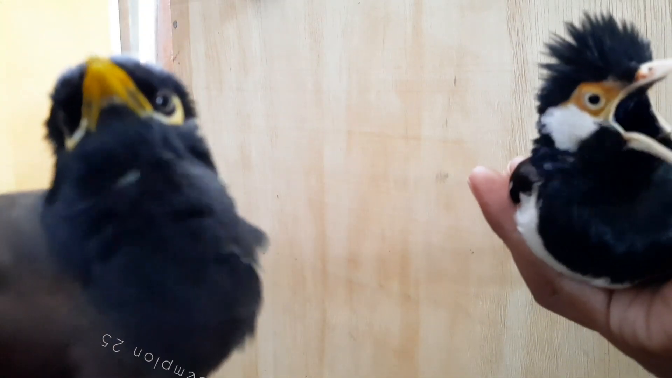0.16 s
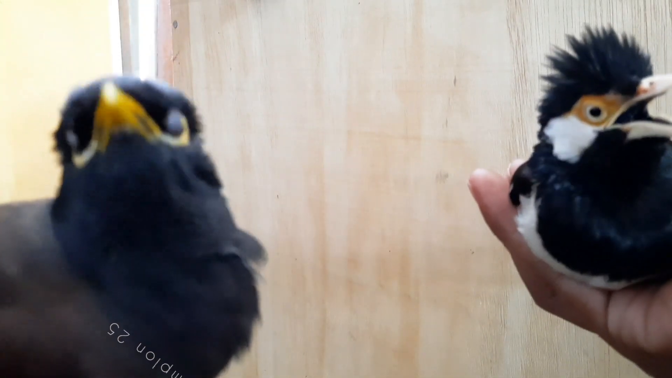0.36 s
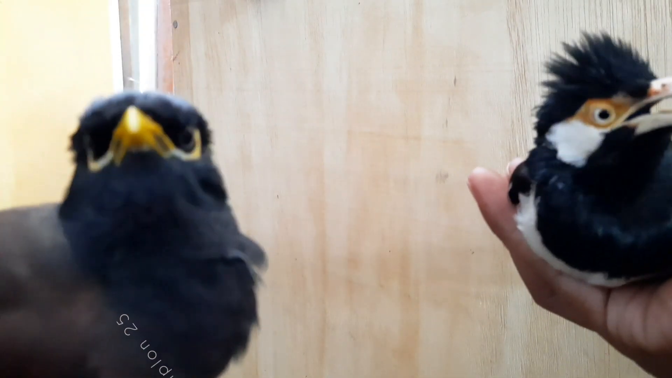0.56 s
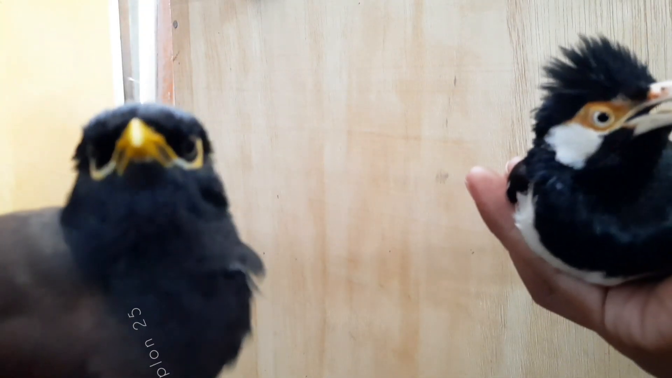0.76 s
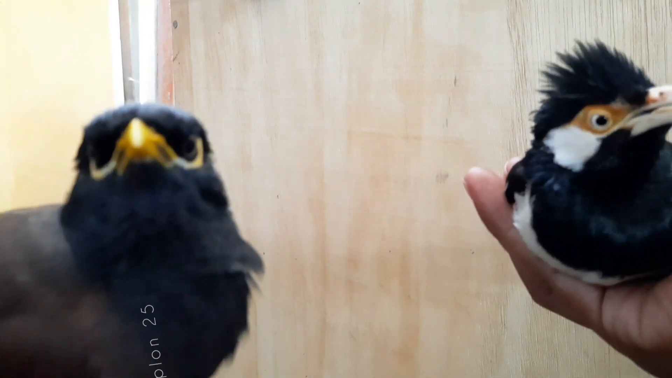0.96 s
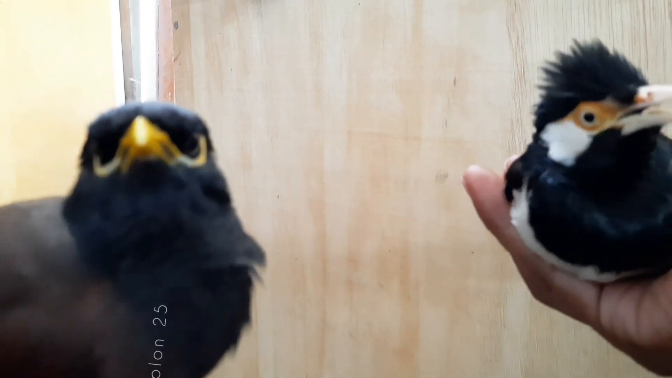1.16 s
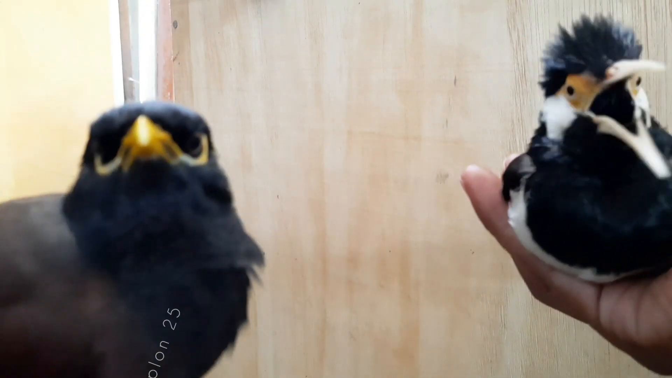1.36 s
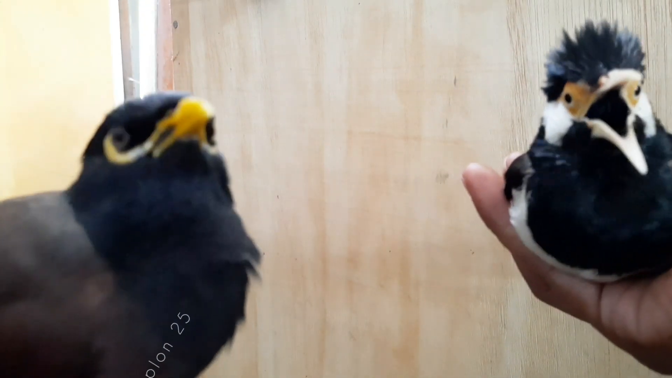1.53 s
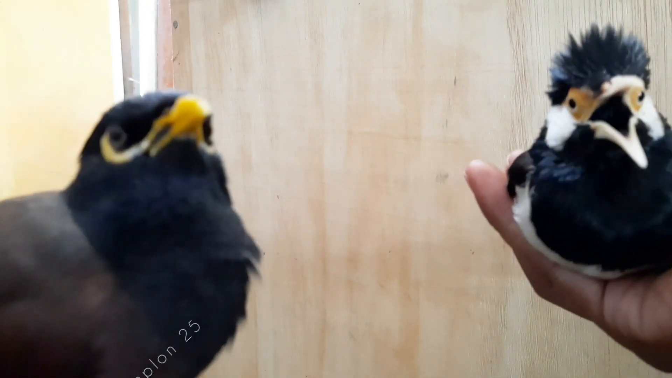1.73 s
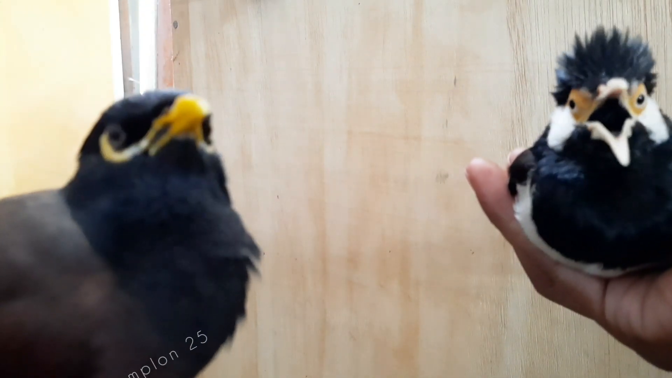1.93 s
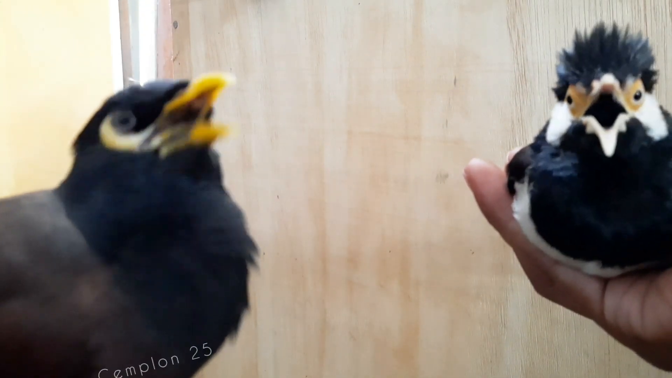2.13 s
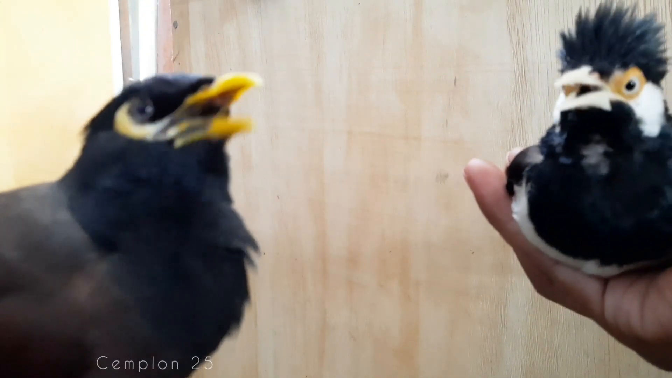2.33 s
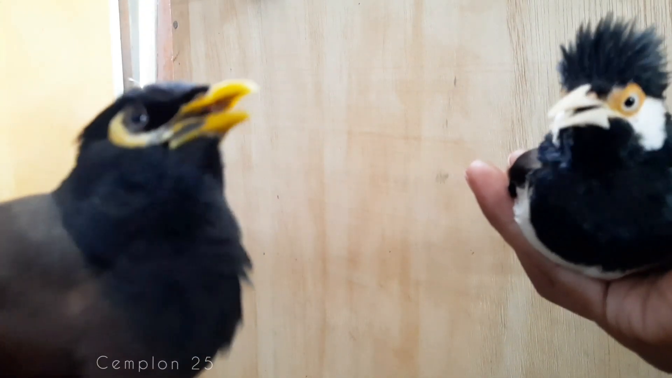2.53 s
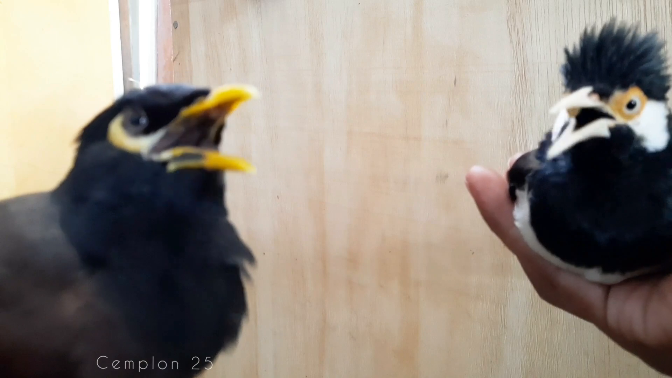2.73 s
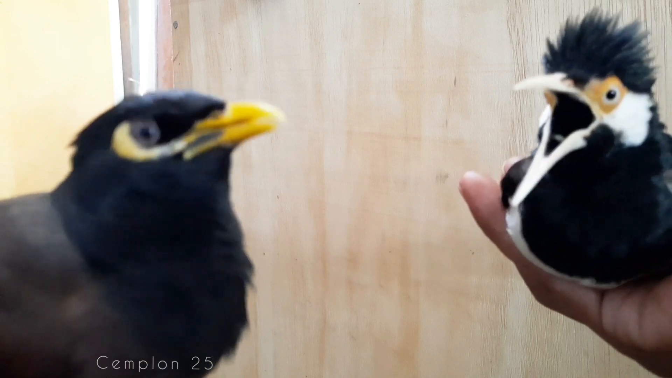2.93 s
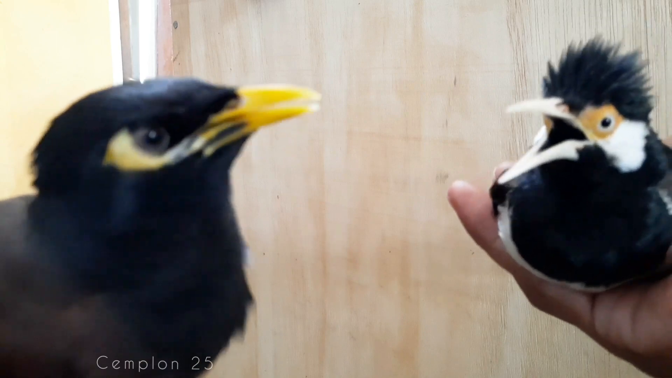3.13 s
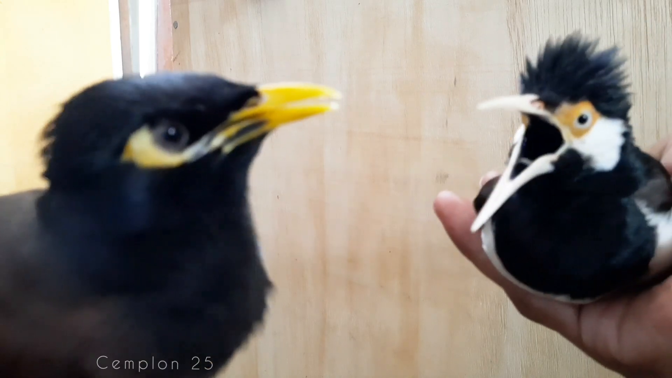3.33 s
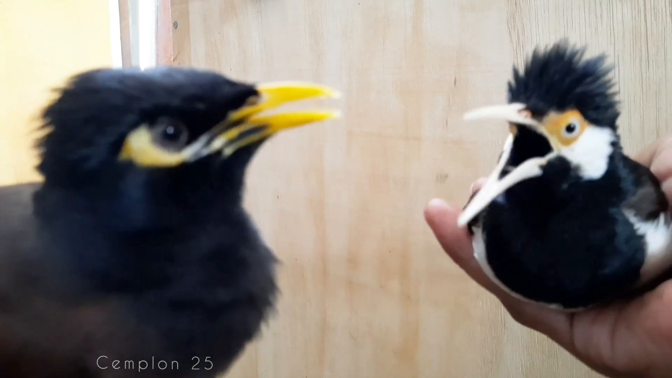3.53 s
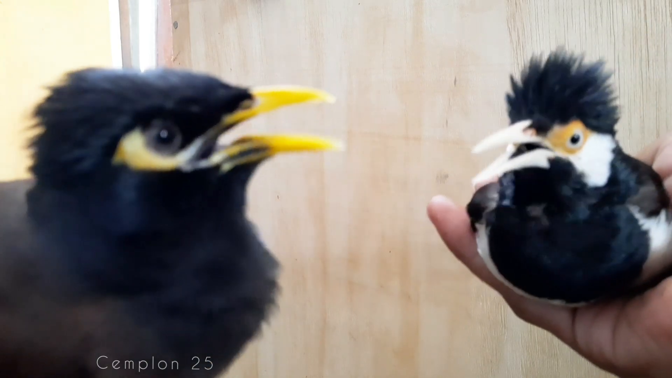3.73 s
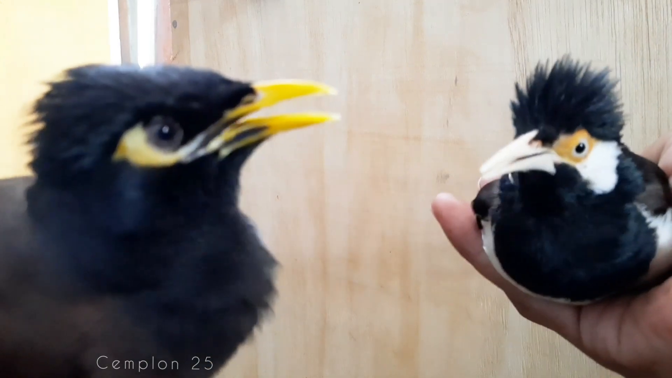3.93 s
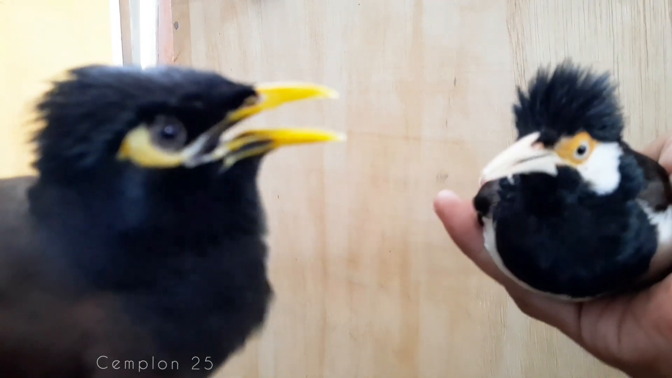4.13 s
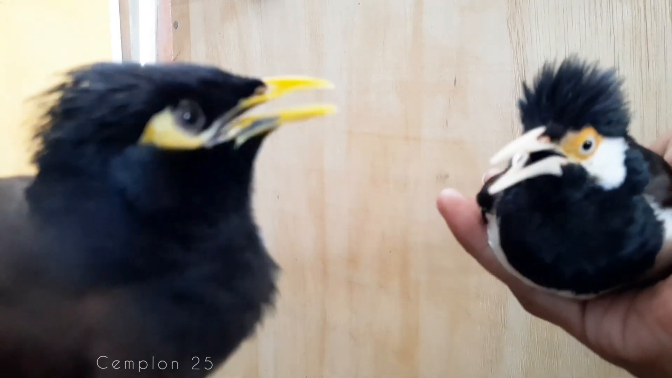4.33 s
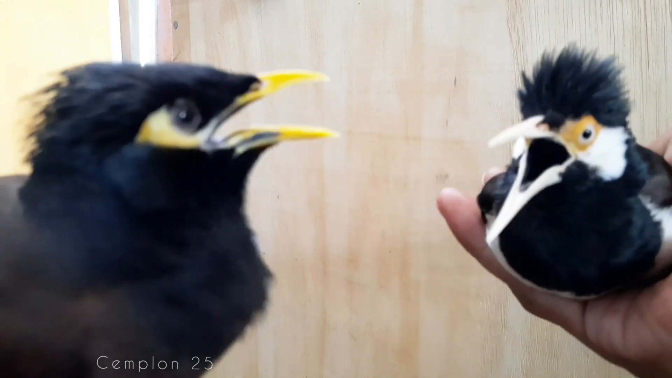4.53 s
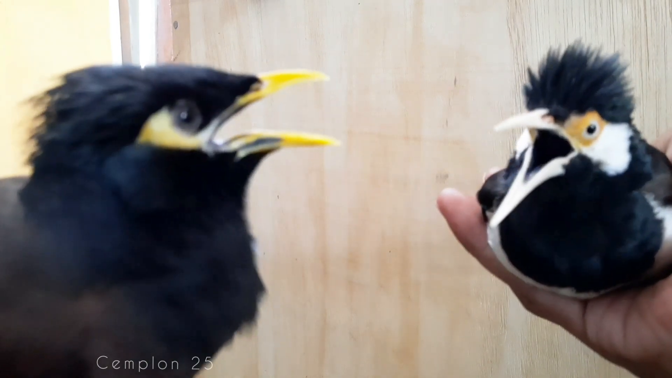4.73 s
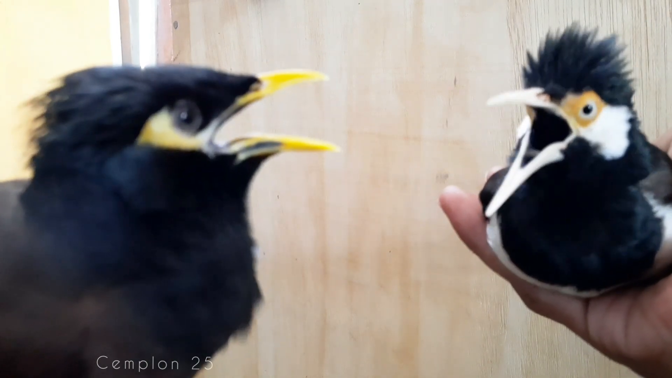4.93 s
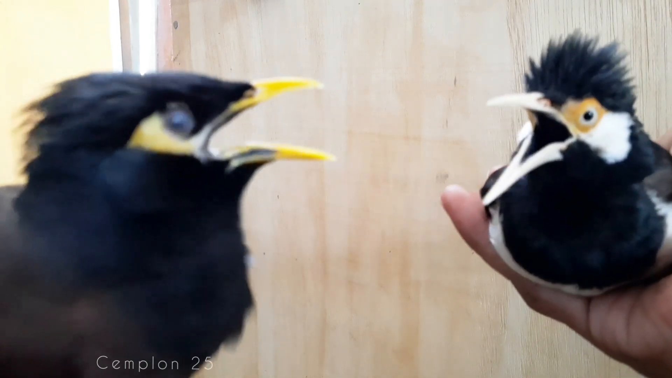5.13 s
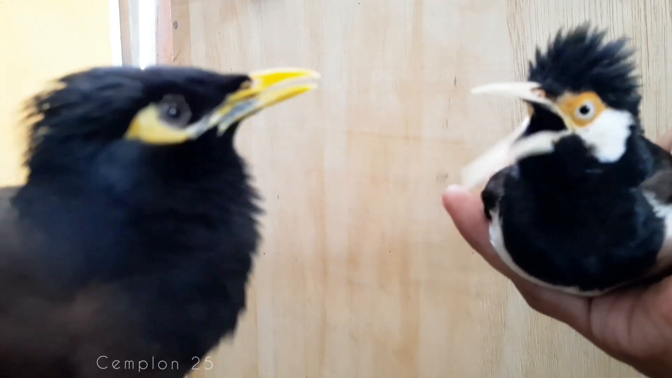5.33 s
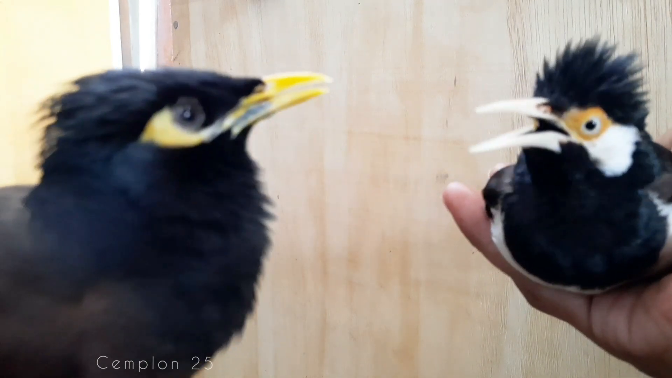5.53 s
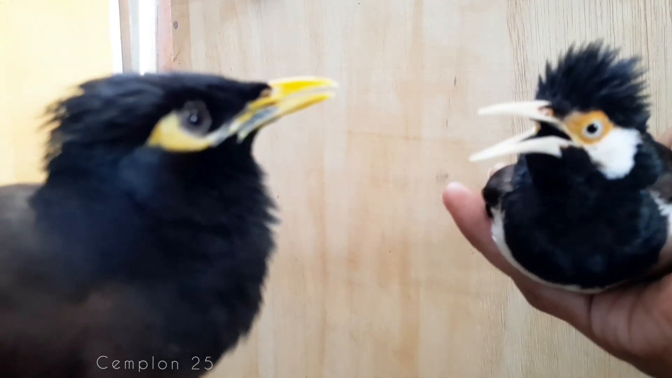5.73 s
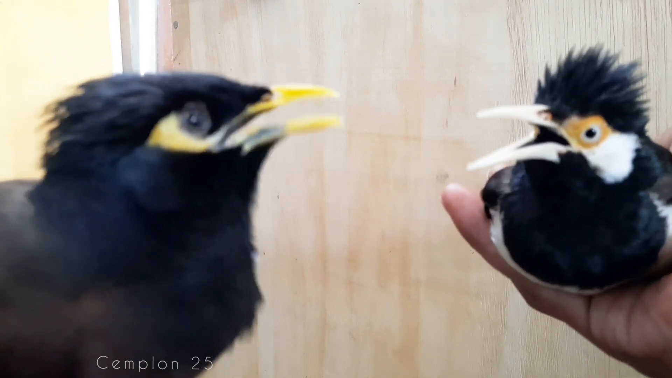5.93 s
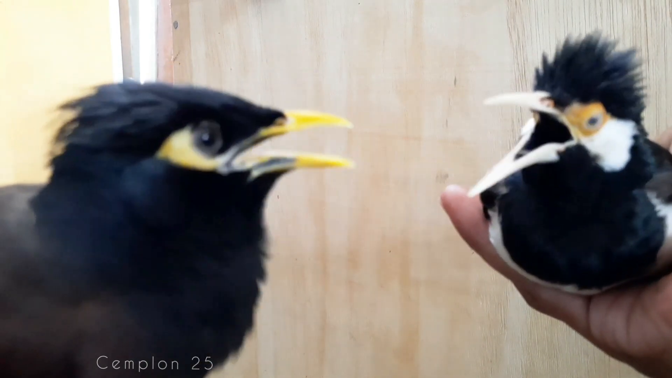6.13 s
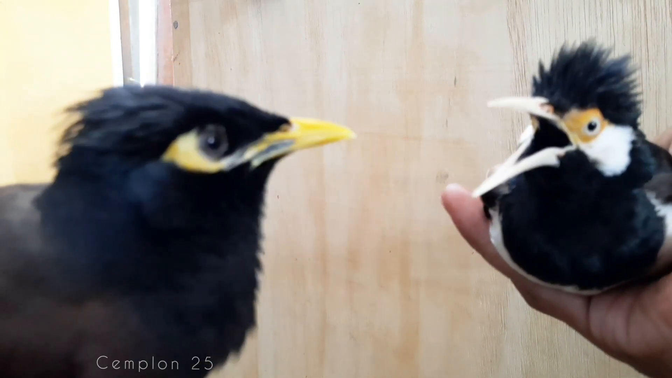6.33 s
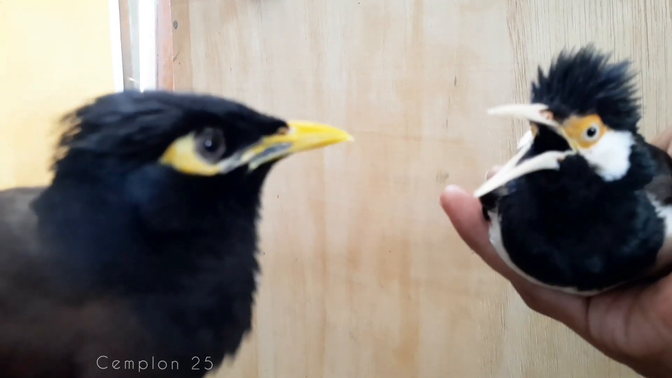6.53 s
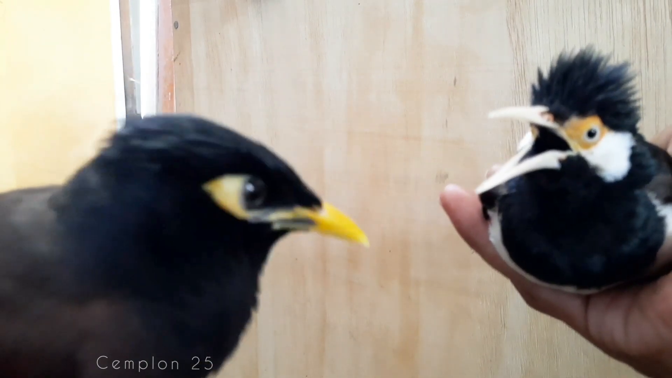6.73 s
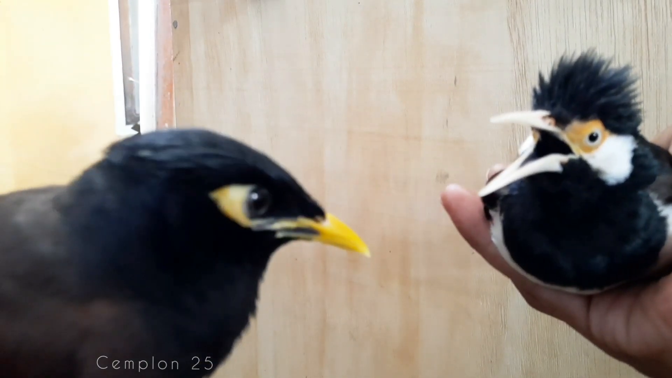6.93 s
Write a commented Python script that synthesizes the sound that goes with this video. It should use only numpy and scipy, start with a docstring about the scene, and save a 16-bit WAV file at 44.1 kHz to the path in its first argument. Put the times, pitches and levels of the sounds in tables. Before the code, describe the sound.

Close myna and pied starling calls indoors: loud piercing whoops, a long wail, then dense squawks and chirps, with a dull engine hum outside.

```python
"""A small room, close to a wall: a pied starling and a myna call at each other near a pair of microphones.
Each voices gliding whistles and cries, often two at once: unsteady tones with overtones from the syrinx.
They break into squawks of tumbling pitch; between them pulses ring the throat as dry rasps, ticks and
a low growl. Outside an engine drones faintly, its firings filtered by the walls, over soft room hiss."""
import sys
import numpy as np
from scipy import signal
from scipy.fft import rfft, irfft
from scipy.io import wavfile
from scipy.ndimage import uniform_filter1d

SR = 44100
rng = np.random.default_rng(int(sys.argv[2]) if len(sys.argv) > 2 else 0)


def store_wav(level_fs):
    """Save 16-bit WAV to argv[1]."""
    pcm = np.round(np.clip(np.atleast_2d(level_fs), -1, 1) * 32767)
    wavfile.write(sys.argv[1], SR, pcm.T.astype(np.int16))


N = 307818
TIME = np.arange(N) / SR
STEP_S = .001   # spacing of the pitch and level controls
LEFT_LEAD_S = .00023   # harsh sounds reach the left microphone this much earlier
CUTOFF_HZ = 15900

# engine outside, pace: (time [s], firing rate [1/s])
ENGINE_SPEED = [(0, 27.5), (.5, 27.5), (1.4, 27.5), (2.4, 27.5), (2.85, 26.5), (3.3, 25), (4.3, 23.5),
                (5.5, 24.5), (7, 26)]
# engine outside, loudness: (time [s], level [dB])
ENGINE_LEVEL = [(0.0, -45), (0.66, -40), (2.88, -36.5), (3.89, -46.5), (4.31, -42), (5.15, -46),
                (5.75, -44), (6.01, -51.5), (6.69, -44), (6.98, -45.5)]
# engine colour early on: (frequency [Hz], gain [dB])
ENGINE_NEAR = [(21, -43), (35, -9), (62, 7), (81, -31.5), (92, -5), (152, 5.5), (172, -6), (195, -11),
               (267, -14.5), (298, -6), (326, 0), (487, -24), (700, -29.5), (910, -57.5), (1540, -120)]
# engine colour later, and of its diffuse part: (frequency [Hz], gain [dB])
ENGINE_FAR = [(21, -51.5), (35, -17), (64, -0.5), (151, 3.5), (189, -17), (216, -1), (255, -13), (312, 1),
              (430, -28.5), (484, -42), (600, -17), (780, -47.5), (1320, -120)]
# exhaust booms at 6 and 12 times the firing rate: (time [s], sixth order peak [dB], twelfth order peak [dB])
BOOM = [(0, -54, -72), (.6, -59, -46), (1.15, -56, -39.5), (1.4, -43, -57), (2.3, -39.5, -50),
        (2.9, -34.5, -57), (3.4, -49, -48.5), (4, -64.5, -61.5)]
# colour of the room air: (frequency [Hz], gain [dB])
AIR = [(240, -25), (400, -7.5), (598, -22.5), (645, -18), (1090, -28.5), (1380, -26), (1760, -29.5),
       (1960, -26), (4650, -48), (5270, -22), (5520, -48), (13900, -49), (16000, -71)]
# loudness of the room air: (time [s], level [dB])
AIR_LEVEL = [(0, -53), (1, -50.5), (2.7, -48.5), (4, -51), (5.2, -55.5), (6.3, -59), (7, -59.5)]
# reflections off the near wall at the left microphone: (delay [s], level [dB])
WALL_ECHOES = [(.0031, -24.5), (.0068, -18), (.0115, -21)]
# colour of the reverberation: (frequency [Hz], gain [dB])
ROOM_COLOUR = [(200, -5.5), (1000, 2), (2500, -1.5), (3800, 1), (6000, -3), (11000, -2), (16000, -12.5)]
# left-right balance at the microphones: (frequency [Hz], left over right [dB])
BALANCE_DB = [(300, 4.5), (750, 6.5), (1500, 3), (2200, 13), (3100, -1), (4400, 2.5), (6000, 4.5),
              (7000, -0.5), (11200, 8.5), (14000, 0.5)]
# relative weight of the voice's high overtones: (frequency [Hz], gain [dB])
OVERTONES = [(2500, 26.5), (4000, 2.5), (6500, 2), (8400, -9), (9700, -9), (11400, 2), (13000, -6.5),
             (15500, -13)]

# whoops swoop down and climb again: (start [s], lowest [s], end [s], top [Hz], lowest pitch [Hz],
# end pitch [Hz], level [dB], left over right [dB])
WHOOPS = [(-.02, 0.077, .208, 5670, 2720, 4160, -9.5, -6),
          (1.272, 1.377, 1.4963, 5680, 3000, 4120, -11, -4.5)]
# opening upward flick: length and share of the pitch; curve of the swoop
WHOOP_FLICK_S, WHOOP_FLICK, WHOOP_BEND = .013, .13, 2.5
# whoops are loudest at the bill's resonance: (pitch [Hz], gain [dB])
WHOOP_GAIN = [(2700, -9.5), (3000, 0), (3280, -0.5), (3650, -3), (4050, -4.5), (5600, -2.5)]
# the octave takes over on the lowest whoop notes: (pitch [Hz], octave [dB])
WHOOP_OCTAVE = [(2700, -3.5), (2950, -16), (3250, -31), (4100, -23.5), (5600, -24.5)]

# flutes, pure held notes: (start [s], end [s], first pitch [Hz], last pitch [Hz], scoop [share], droop [share],
# level [dB], swell [dB], octave [dB], higher overtones [dB], left over right [dB])
FLUTES = [(0, .13, 1539, 1710, 0.31, 0.046, -21, -4.5, -13.5, -17, 8.5),
          (2.19, 2.47, 1311, 1297, 0.13, 0.039, -26, -3.5, -9.5, -25, 10.5),
          (4.098, 4.169, 1188, 1179, 0.078, 0.0056, -29.5, 2, 11, -5, 2)]
# cries, hoarse held notes: (start [s], end [s], first pitch [Hz], last pitch [Hz], scoop [share],
# droop [share], level [dB], swell [dB], octave [dB], higher overtones [dB], left over right [dB])
CRIES = [(4.395, 4.485, 4330, 4550, 0.084, 0.012, -19, -19, -24, -19, -0.5),
         (4.802, 4.938, 2306, 2180, 0.049, 0.21, -22, -6, 7, -3.5, 24),
         (5.184, 5.312, 2045, 2419, 0.062, 0.042, -17.5, 0, -0.5, -9.5, 8.5),
         (6.062, 6.162, 2170, 2295, .27, .12, -21, 2, -13.5, -16.5, 12),
         (6.095, 6.207, 2077, 2012, .05, .11, -24.5, 1.5, 6, -4, -19)]
SCOOP_S, DROOP_S = 0.011, 0.022   # time constants of the held notes' opening scoop and closing droop

# squawks: (start [s], end [s], first pitch [Hz], last pitch [Hz], level [dB])
SQUAWKS = [(0.01, 0.051, 2100, 1886, -34), (2.595, 2.71, 1500, 1332, -37), (2.737, 2.894, 1500, 1310, -34),
           (2.948, 2.965, 1723, 1500, -28), (3.729, 3.81, 1300, 1063, -29), (4.389, 4.462, 1500, 1075, -21),
           (4.622, 4.689, 1500, 850, -18.5), (4.814, 4.915, 1719, 977, -20.5),
           (5.056, 5.103, 1730, 1155, -20.5), (6.097, 6.118, 1104, 944, -29)]
# shaky slides: (start [s], peak [s], end [s], first pitch [Hz], peak pitch [Hz], last pitch [Hz],
# level at the peak [dB], octave [dB], higher overtones [dB], left over right [dB])
SLIDES = [(.128, .142, 0.17, 1500, 835, 430, -34.5, 0.5, -2.5, 8),
          (.205, .235, 0.32, 2900, 2200, 1850, -27, -30, -19.5, -1.5),
          (3.712, 3.735, 3.74, 1222, 990, 860, -36.5, -2, 0, 4),
          (4.44, 4.448, 4.495, 3500, 3630, 3100, -18.5, -19, -22.5, -0.5),
          (4.652, 4.661, 4.79, 3850, 3550, 3000, -25.5, -15.5, -16.5, 1.5),
          (6.155, 6.168, 6.2, 1980, 1600, 1033, -27, -14, -18, 6)]
# chirps: (start [s], peak [s], end [s], first pitch [Hz], peak pitch [Hz], last pitch [Hz],
# level at the peak [dB], octave [dB], higher overtones [dB], left over right [dB])
CHIRPS = [(3.798, 3.812, 3.834, 4730, 3900, 3894, -25.5, -10, -24, 8),
          (5.089, 5.096, 5.118, 3670, 3810, 3400, -10, -28, -26, 1),
          (5.312, 5.34, 5.385, 4535, 3076, 2250, -6.5, -21, -21, -1)]
# one faint twitter: (start [s], peak [s], end [s], first pitch [Hz], peak pitch [Hz], last pitch [Hz],
# level at the peak [dB], octave [dB], higher overtones [dB], left over right [dB])
TWITTER = [(5.39, 5.46, 5.635, 3500, 3705, 3780, -30, -18, -24.5, 2.7)]

# rasps: (start [s], end [s], level [dB])
RASPS = [(1.375, 1.408, -39), (1.533, 1.592, -42.5), (1.717, 1.746, -41), (1.907, 1.95, -40),
         (2.098, 2.123, -40), (2.291, 2.322, -35.5), (2.488, 2.53, -44.5), (3.481, 3.554, -26),
         (3.925, 3.996, -26)]
# runs of four throat ticks: (start [s], relative strength [dB])
TICKS = [(3.088, -3), (3.287, -2.5)]
TICK_GAP_S = .0244
# resonances of the open throat under rasps and ticks: (frequency [Hz], width [Hz], gain [dB])
THROAT = [(750, 310, -3.5), (1500, 250, 2), (2150, 350, -1), (2860, 140, -2), (3620, 130, -5),
          (6300, 700, -4.5), (11700, 810, -15), (14000, 990, -19)]

# arches leap up, hold and sink: (start [s], crest [s], end [s], top [Hz], half-fall time [s],
# level [dB], swell [dB], left over right [dB])
ARCHES = [(2.001, 2.044, 2.2, 6300, 0.048, -24.5, -1.5, 1), (2.327, 2.37, 2.57, 6080, 0.061, -24, -8, 4.5),
          (2.67, 2.716, 2.882, 6135, 0.071, -20, -4, 5), (4.42, 4.489, 4.531, 6740, 0.038, -19, 23, 7)]
# opening scoop (share of the pitch, time constant) and the pitch they relax towards
ARCH_SCOOP, ARCH_SCOOP_S, ARCH_REST_HZ = .58, 0.008, 2200
# an arch thins out halfway down: (pitch [Hz], gain [dB])
ARCH_GAIN = [(2500, -2), (3000, 0), (3800, 2), (4800, -3.5), (5500, 0.5), (6200, -1)]
OCTAVE_FADE_DB = 19   # arches and pips lose this much octave overtone for each octave below their top

# a yelp that breaks upward: (time [s], pitch [Hz], level [dB], octave [dB], higher overtones [dB])
YELP = [(2.775, 2016, -22, -5.5, -11), (2.786, 2826, -19.5, 0.5, -34), (2.808, 2860, -12, -23.5, -37),
        (2.82, 3500, -14.5, -27.5, -17), (2.85, 3920, -27, 2.5, 16.5), (2.868, 3860, -25, -26.5, -25)]
# the long wail: (time [s], pitch [Hz], level [dB])
WAIL = [(3.25, 1454, -25), (3.268, 1977, -24), (3.31, 2212, -27), (3.366, 2373, -26.5),
        (3.428, 2413, -24.5), (3.596, 2216, -23.5), (3.748, 1910, -18.5), (3.796, 1750, -18.5),
        (3.812, 1579, -29)]
# a falling croak: (time [s], pitch [Hz], level [dB], octave [dB], higher overtones [dB])
CROAK = [(4.169, 1121, -37.5, 24, -2), (4.196, 794, -29, 0, 7), (4.222, 750, -29, 7.5, -7.5),
         (4.245, 442.1, -43, -6.5, -10)]
# pips jump to one high pitch and drop back: (start [s], drop [s], end [s], top [Hz], level [dB],
# left over right [dB])
PIPS = [(4.341, 4.413, 4.412, 5317, -25, 0), (4.556, 4.62, 4.637, 5398, -22, -1),
        (4.776, 4.831, 4.845, 5410, -20, 2), (5, 5.055, 5.074, 5430, -21, 2)]
PIP_REST_HZ, PIP_RISE_S, PIP_SWITCH_S = 3500, .009, .002

GROWL_START_S, GROWL_END_S, GROWL_DB, GROWL_SWELL_DB = 5.21, 5.82, -34, -4.5
# low throat resonances of the growl: (frequency [Hz], width [Hz], gain [dB])
GROWL_THROAT = [(566, 600, -2), (850, 330, 4), (1132, 140, 1.5), (2100, 1200, -9.5)]


def from_db(db):
    """Amplitude ratio of a level in dB."""
    return 10 ** (np.asarray(db) / 20)


def rms_one(x):
    """Scale to an RMS of 1."""
    return x / np.sqrt(np.mean(x ** 2) + 1e-20)


def curves(rows, t):
    """Columns of a table joined by straight lines in time."""
    s, *columns = np.transpose(rows)
    return [np.interp(t, np.sort(s), c) for c in columns]


def at_hz(points, hz):
    """A spectrum in dB read on a log-frequency axis."""
    f, db = np.transpose(points)
    return np.interp(np.log(np.maximum(hz, 1)), np.log(f), db)


def coloured(x, spectrum):
    """Filter by a smooth spectrum."""
    size = x.shape[-1]
    gains = from_db(at_hz(spectrum, np.fft.rfftfreq(size, 1 / SR)))
    return irfft(rfft(x) * gains, size)


def drift(size, rate):
    """Smooth random wander: noise low-passed twice near rate (Hz), about 1 in RMS."""
    r = np.exp(-2 * np.pi * rate / SR)
    noise = rng.standard_normal(size + SR // 2)   # the extra half second lets the filter settle
    return rms_one(signal.lfilter([1], [1, -2 * r, r * r], noise))[-size:]


def span(start, end, fade_s):
    """Sample indices of a call and its soft gate."""
    first = max(0, int((start - fade_s / 2) * SR))
    last = min(N, int((max(end, start + .005) + fade_s / 2) * SR))
    i = np.arange(first, last)
    to_edge = np.minimum(i - i[0], i[-1] - i)
    return i, np.sin(np.pi / 2 * np.clip(to_edge / (fade_s * SR), 0, 1)) ** 2


def panned(db):
    """Left and right gains of constant power."""
    gains = from_db(np.array([db, -db]) / 2)
    return gains / np.sqrt(np.mean(gains ** 2, axis=0))


def placed(x):
    """A broadband sound balanced between the two microphones, frequency by frequency."""
    return irfft(rfft(x) * panned(at_hz(BALANCE_DB, np.fft.rfftfreq(N, 1 / SR))), N)


def resonate(x, modes):
    """Parallel resonances with alternating signs."""
    out = 0
    for k, (hz, width, db) in enumerate(modes):
        r = np.exp(-np.pi * width / SR)
        poles = [1, -2 * r * np.cos(2 * np.pi * hz / SR), r * r]
        ringing = signal.lfilter([1, 0, -1], poles, x + 1e-18)
        out = out + (-1) ** k * from_db(db) * (1 - r * r) / 2 * ringing
    return out


def pulses(rate):
    """One unit click a cycle."""
    return np.diff(np.floor(np.cumsum(rate) / SR), prepend=0)


def envelope(t, attack_s, release_s, edge_db, swell_db=0):
    """Level in dB: attack, a hold that swells or sags, release."""
    edges = np.exp(-(t - t[0]) / attack_s) + np.exp((t - t[-1]) / release_s)
    return edge_db * edges + swell_db * np.linspace(-.5, .5, len(t))


def note(t, hz, db, octave_db, high_db, pan_db):
    """Controls of one sung note; the overtones are given relative to the fundamental."""
    return np.column_stack(np.broadcast_arrays(t, hz, db, db + octave_db, db + high_db, pan_db))


def sing(notes, jitter, flutter_db, hoarse_db, lead_s, dip=0, dip_hz=50, undertone_db=None):
    """One side of the syrinx: an unsteady gliding tone with overtones, lead_s earlier at the left microphone."""
    out = np.zeros((2, N))
    for rows in notes:
        i, gate = span(rows[0][0], rows[-1][0], fade_s=.006)
        hz, first_db, octave_db, high_db, pan_db = curves(rows, TIME[i])

        # a quavering voice drops briefly in pitch, dip_hz times a second and never twice alike
        dip_shape = np.cos(np.pi * dip_hz * (TIME[i] - TIME[i[0]])) ** 16
        dips = dip * dip_shape * from_db(3 * drift(len(i), 40))
        hz = uniform_filter1d(hz, size=130) * (1 + jitter * drift(len(i), 170) - dips)

        # fast phase wander makes the tone hoarse
        phase = 2 * np.pi * np.cumsum(hz) / SR + from_db(hoarse_db) * drift(len(i), 850)
        phases = np.array([phase, phase - 2 * np.pi * hz * lead_s])[:, None]

        k = np.arange(1, 14)[:, None]   # harmonic numbers
        below_cutoff = np.clip((CUTOFF_HZ + 500 - k * hz) / 500, 0, 1)
        gains = from_db(at_hz(OVERTONES, k * hz)) * below_cutoff
        gains[2:] *= from_db(high_db) / np.sqrt(np.sum(gains[2:] ** 2, axis=0) + 0.016)
        gains[0], gains[1] = from_db(first_db), from_db(octave_db)
        pans = at_hz(BALANCE_DB, k * hz)
        pans[0] = pan_db
        voice = np.sum(panned(pans) * gains * np.sin(k * phases), axis=1)

        if undertone_db is not None:   # every third cycle differs: faint lines at thirds of the pitch
            thirds = sum(np.sin(m * phase / 3) for m in (1, 2, 4))
            voice += from_db(first_db + undertone_db) * thirds
        flutter = from_db(flutter_db * drift(len(i), 100))
        out[:, i] += np.sqrt(2) * voice * gate * flutter
    return out


def background(near_rough_db=-43, far_rough_db=-31):
    """An engine's firings through the walls, turning from near to far colour, and the faint hiss of the room."""
    speed, = curves(ENGINE_SPEED, TIME)
    firings = pulses(speed * (1 + 0.00681 * drift(N, 6)))
    near = rms_one(coloured(firings + from_db(near_rough_db) * rng.standard_normal(N), ENGINE_NEAR))
    far = rms_one(coloured(firings + from_db(far_rough_db) * rng.standard_normal(N), ENGINE_FAR))
    diffuse = from_db(-11.0) * rms_one(coloured(rng.standard_normal((2, N)), ENGINE_FAR))
    gone = np.clip((TIME - 2.9) / 1.6, 0, 1)   # crossfade from near to far
    firing = from_db(-3.0) * np.sqrt(1 - gone) * near + np.sqrt(gone) * far
    engine = (firing + diffuse) * from_db(curves(ENGINE_LEVEL, TIME)[0])

    # the air is partly common to both microphones, the hiss separate at each
    air = rms_one(coloured(rng.standard_normal((2, N)) + rng.standard_normal(N), AIR))
    hiss_colour = [(1000, -3.5), (4000, -2.0), (9000, -7.0), (16000, -12)]   # (Hz, dB)
    hiss = from_db(-70) * rms_one(coloured(rng.standard_normal((2, N)), hiss_colour))
    return engine + hiss + air * from_db(curves(AIR_LEVEL, TIME)[0])


def exhaust():
    """Smooth tones at 6 and 12 times the firing rate, following the engine's speed with a slight wander."""
    speed, = curves(ENGINE_SPEED, TIME)
    turns = 2 * np.pi * np.cumsum(speed * (1 + 0.0049 * drift(N, 6.9))) / SR
    sixth_db, twelfth_db = curves(BOOM, TIME)
    return from_db(sixth_db) * np.sin(6 * turns) + from_db(twelfth_db) * np.sin(12 * turns)


def whoops(high_db=-16):
    """A flick to the top, a slowing swoop down through the bill's resonance and a steady climb."""
    for start, lowest, end, top_hz, low_hz, end_hz, db, pan_db in WHOOPS:
        t, top = np.arange(start, end, STEP_S), start + WHOOP_FLICK_S
        swoop = (top_hz - low_hz) * np.interp(t, [top, lowest], [1, 0]) ** WHOOP_BEND
        climb = np.interp(t, [lowest, end], [low_hz, end_hz])
        hz = (climb + swoop) * np.interp(t, [start, top], [1 - WHOOP_FLICK, 1])
        gain = at_hz(WHOOP_GAIN, hz)
        level = db + gain + envelope(t, 0.0011, 0.0043, edge_db=-6)
        # the bill's gain lifts only the fundamental
        yield note(t, hz, level, at_hz(WHOOP_OCTAVE, hz) - gain, high_db - gain, pan_db)


def held(rows, attack_s, release_s, edge_db):
    """Pitch and level sag together where the air pressure builds and where it ends."""
    for start, end, first_hz, last_hz, scoop, droop, db, swell_db, octave_db, high_db, pan_db in rows:
        t = np.arange(start, end, STEP_S)
        sag = scoop * np.exp((start - t) / SCOOP_S) + droop * np.exp((t - end) / DROOP_S)
        hz = np.linspace(first_hz, last_hz, len(t)) * (1 - sag)
        level = db + envelope(t, attack_s, release_s, edge_db, swell_db)
        yield note(t, hz, level, octave_db, high_db, pan_db)


def squawks(wander=.07, wander_hz=90, swoop=.6, swoops_per_s=48):
    """The membranes lose their lock: pitch tumbles in uneven swoops; the open bill favours 3.5 kHz."""
    bill = [(800, -18), (1500, -15.5), (2400, -1.0), (3500, 1.0), (4900, -14.0), (6500, -5.5),
            (8500, -22.5), (11300, -15.5), (15500, -31.5)]   # (Hz, dB)
    out, k = np.zeros(N), np.arange(1, 18)[:, None]
    for start, end, first_hz, last_hz, db in SQUAWKS:
        i, gate = span(start, end, fade_s=0.0091)
        # a falling sawtooth of uneven rate
        tumble = .5 - np.cumsum(swoops_per_s * np.exp(.4 * drift(len(i), 60))) / SR % 1
        grit = .014 * drift(len(i), 900)
        bend = swoop * tumble + wander * drift(len(i), wander_hz) + grit
        hz = np.geomspace(first_hz, last_hz, len(i)) * np.exp(bend)
        gains = from_db(at_hz(bill, k * hz)) * (k * hz < CUTOFF_HZ)
        partials = gains * np.sin(k * 2 * np.pi * np.cumsum(hz) / SR)
        flutter = from_db(2 * drift(len(i), 120))
        out[i] += from_db(db) * gate * rms_one(partials.sum(axis=0) * flutter)
    return placed(out)


def glides(rows, first_db, last_db):
    """Short notes that glide into their loudest moment and away from it."""
    for start, peak, end, first_hz, peak_hz, last_hz, db, octave_db, high_db, pan_db in rows:
        level = db + np.array([first_db, 0, last_db])
        yield note([start, peak, end], [first_hz, peak_hz, last_hz], level, octave_db, high_db, pan_db)


def thin_rise(start_s=.86, end_s=1.268, first_hz=1665, last_hz=3040, bend=1.55, db=-35):
    """A thin tone climbs ever more slowly and grows, leading into a whoop."""
    t = np.arange(start_s, end_s, STEP_S)
    hz = last_hz + (first_hz - last_hz) * np.linspace(1, 0, len(t)) ** bend
    level = db + envelope(t, 0.009, 0.029, edge_db=-9, swell_db=24.5)
    return [note(t, hz, level, octave_db=-32, high_db=-30, pan_db=4.5)]


def rasps_and_ticks(pulse_hz=750, jitter=0.12, hiss_db=-24):
    """Uneven runs of pulses, and single snaps, ring the open throat."""
    buzz = pulses(pulse_hz * np.exp(jitter * drift(N, 400))) * from_db(4.1 * rng.standard_normal(N))
    buzz = rms_one(resonate(buzz + from_db(hiss_db) * rng.standard_normal(N), THROAT))
    effort, snaps = np.zeros(N), np.zeros(N)
    for start, end, db in RASPS:
        i, gate = span(start, end, fade_s=0.012)
        effort[i] += from_db(db) * gate
    for start, db in TICKS:
        for k in range(4):
            i = np.arange(SR // 200)   # a click and 5 ms of dying scrape
            scrape = 0.25 * rng.standard_normal(len(i)) * np.exp(-i / (0.0013 * SR))
            snaps[int((start + k * TICK_GAP_S) * SR) + i] = from_db(db) * ((i == 0) + scrape)
    return placed(buzz * effort + from_db(12.0) * resonate(snaps, THROAT))


def arches(octave_db=-3, high_db=-37):
    """A leap to the top, then the pitch relaxes towards rest and the octave fades."""
    for start, crest, end, top_hz, fall_s, db, swell_db, pan_db in ARCHES:
        t = np.arange(start, end, STEP_S)
        fall = 1 + (np.maximum(t - crest, 0) / fall_s) ** 2
        hz = ARCH_REST_HZ + (top_hz - ARCH_REST_HZ) / fall
        hz = hz * (1 - ARCH_SCOOP * np.exp((start - t) / ARCH_SCOOP_S))
        level = db + at_hz(ARCH_GAIN, hz) + envelope(t, .008, .008, edge_db=-9, swell_db=swell_db)
        octave = octave_db + OCTAVE_FADE_DB * np.log2(hz / top_hz) + at_hz(OVERTONES, 2 * hz)
        yield note(t, hz, level, octave, high_db, pan_db)


def warble(start_s=2.886, settle_s=2.922, end_s=2.963, top_hz=3390, depth_hz=600, shake_hz=73,
           lag_s=.003, db=-12.0):
    """A fast, deep shake of the pitch that calms to a quarter of its depth below the top."""
    t = np.arange(start_s, end_s, STEP_S)
    depth = np.interp(t, [settle_s - .005, settle_s + 0.006], [1, .25])
    shake = np.cos(np.pi * shake_hz * (t - start_s - lag_s)) ** 2 * depth
    level = db + envelope(t, .003, 0.0059, edge_db=-10, swell_db=-4.5)
    return [note(t, top_hz - depth_hz * shake, level, octave_db=-21, high_db=-17.5, pan_db=-1.5)]


def wail(first_octave_db=10, last_octave_db=-25, high_db=2.0, dulling_db=75, dullest_db=-16, pan_db=2):
    """The octave dies away; the high overtones flare at the crest and dull with each octave below it."""
    t, hz, db = np.transpose(WAIL)
    octave_db = np.interp(t, t[[0, -1]], [first_octave_db, last_octave_db])
    high = np.maximum(high_db + dulling_db * np.log2(hz / hz.max()), dullest_db)
    return [note(t, hz, db, octave_db, high, pan_db)]


def pips(octave_db=-3, high_db=-24):
    """The pitch switches up from rest, holds flat and switches back."""
    for start, drop, end, top_hz, db, pan_db in PIPS:
        t = np.arange(start, end, STEP_S)
        risen = 1 / (1 + np.exp((start + PIP_RISE_S - t) / PIP_SWITCH_S))
        not_dropped = 1 / (1 + np.exp((t - drop) / PIP_SWITCH_S))
        hz = PIP_REST_HZ + (top_hz - PIP_REST_HZ) * risen * not_dropped
        level = db + envelope(t, .002, .003, edge_db=-2)
        octave = octave_db + OCTAVE_FADE_DB * np.log2(hz / top_hz)
        yield note(t, hz, level, octave, high_db, pan_db)


def growl(pulse_hz=43, air_db=-27):
    """Slow uneven pulses and rushing air in a low throat resonance, dulled by the shut bill."""
    beats = pulses(pulse_hz * np.exp(.15 * drift(N, 25))) * from_db(2 * rng.standard_normal(N))
    source = beats + from_db(air_db) * rng.standard_normal(N)
    i, gate = span(GROWL_START_S, GROWL_END_S, fade_s=0.0075)
    level = GROWL_DB + envelope(TIME[i], 0.061, 0.028, edge_db=-19.5, swell_db=GROWL_SWELL_DB)
    out = np.zeros(N)
    out[i] = gate * from_db(level) * rms_one(resonate(source, GROWL_THROAT)[i])
    return placed(coloured(out, [(1200, 0.5), (2500, -8), (5000, -13), (12000, -8.5)]))   # (Hz, dB)


def quaver(start_s=5.928, crest_s=5.997, end_s=6.044, top_hz=1655, sag_hz=230, db=-31):
    """A low, shallow arc with a strong octave."""
    t = np.arange(start_s, end_s, STEP_S)
    hz = top_hz - sag_hz * ((t - crest_s) / (crest_s - start_s)) ** 2
    level = db + envelope(t, 0.013, .004, edge_db=-6.5)
    return [note(t, hz, level, octave_db=8.5, high_db=-0.5, pan_db=7.5)]


def whistles():
    """All voiced notes, each kind with its own unsteadiness, hoarseness and lead at the left microphone."""
    flutes = held(FLUTES, attack_s=0.015, release_s=.008, edge_db=-12)
    cries = held(CRIES, attack_s=0.018, release_s=0.0051, edge_db=-9)
    chirps = glides(CHIRPS, first_db=-15, last_db=-12.5)
    slides = glides(SLIDES, first_db=-1.5, last_db=-17.5)
    twitter = glides(TWITTER, first_db=-6, last_db=-25)
    yelp = note(*np.transpose(YELP), pan_db=-3.5)
    croak = note(*np.transpose(CROAK), pan_db=9.5)

    # a negative lead arrives at the right microphone first
    out = sing(flutes, jitter=0.0061, flutter_db=0.66, hoarse_db=-44.5, lead_s=-.00021)
    out += sing(whoops(), jitter=.006, flutter_db=1.2, hoarse_db=-38, lead_s=.00026)
    out += sing(slides, jitter=.02, flutter_db=-0.5, hoarse_db=-32.5, lead_s=.0002)
    out += sing(thin_rise(), jitter=.013, flutter_db=2.5, hoarse_db=-22.5, lead_s=.00028)
    out += sing(arches(), jitter=.0038, flutter_db=3.0, hoarse_db=-26.5, lead_s=0.0002263)
    out += sing([yelp, *warble()], jitter=.024, flutter_db=2.5, hoarse_db=-25, lead_s=.00029)
    out += sing(wail(), jitter=0.0017, flutter_db=0, hoarse_db=-56, lead_s=0.000423)
    out += sing(chirps, jitter=0.012, flutter_db=1.5, hoarse_db=-27.5, lead_s=.00029)
    out += sing([croak], jitter=0.027, flutter_db=1.5, hoarse_db=-17, lead_s=0.00014, dip=.13, dip_hz=114.0)
    out += sing(pips(), jitter=0.00056, flutter_db=2.5, hoarse_db=-28.0, lead_s=.000205, undertone_db=-27.5)
    out += sing(cries, jitter=.009, flutter_db=1.0, hoarse_db=-24.0, lead_s=0.0002514)
    out += sing(twitter, jitter=0.0365, flutter_db=2.5, hoarse_db=-6.5, lead_s=0.00022, dip=.11, dip_hz=31.4)
    out += sing(quaver(), jitter=0.013, flutter_db=1.5, hoarse_db=-25, lead_s=0.00019, dip=.13, dip_hz=51.9)
    return out


def room(x, t60=0.31, wet_db=-19, early_t60=0.053, early_db=-17):
    """Echoes off the near wall, a quick scatter and a soft tail, different at each microphone."""
    t = TIME[:SR * 3 // 4]
    noise = coloured(rng.standard_normal((2, len(t))), ROOM_COLOUR) * (t > .002)
    response = 0
    for seconds, db in ((t60, wet_db), (early_t60, early_db)):
        tail = noise * np.exp(-np.log(1000) * t / seconds)   # 60 dB down after t60
        response = response + from_db(db) * tail / np.sqrt(np.sum(tail ** 2) / 2)
    for s, db in WALL_ECHOES:   # the right microphone hears each echo later
        response[[0, 1], [int(s * SR), int(s * 1.13 * SR)]] += from_db(db)
    return signal.fftconvolve(x, response, axes=1)[:, :N]


def scene():
    """Birds close by with the room's reflections, and the engine and air behind them."""
    harsh = squawks() + rasps_and_ticks() + growl()
    # the right microphone is farther away
    harsh[1] = np.interp(TIME - round(LEFT_LEAD_S * SR) / SR, TIME, harsh[1])
    birds = whistles() + harsh
    return birds + room(birds) + background() + exhaust()


def record(dry):
    """The highest peaks are rounded and the top is cut steeply."""
    rounded = dry / (1 + (dry / .9) ** 8) ** (1 / 8)
    return signal.sosfilt(signal.ellip(10, .1, 80, CUTOFF_HZ, fs=SR, output="sos"), rounded)


dry = scene()
out = record(dry)
store_wav(out)
```